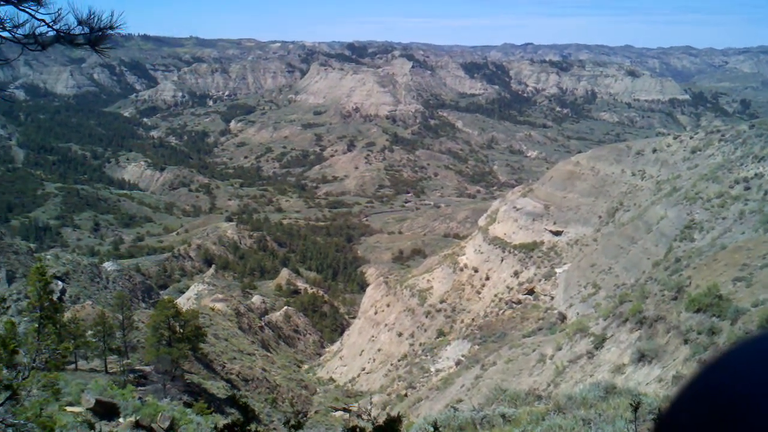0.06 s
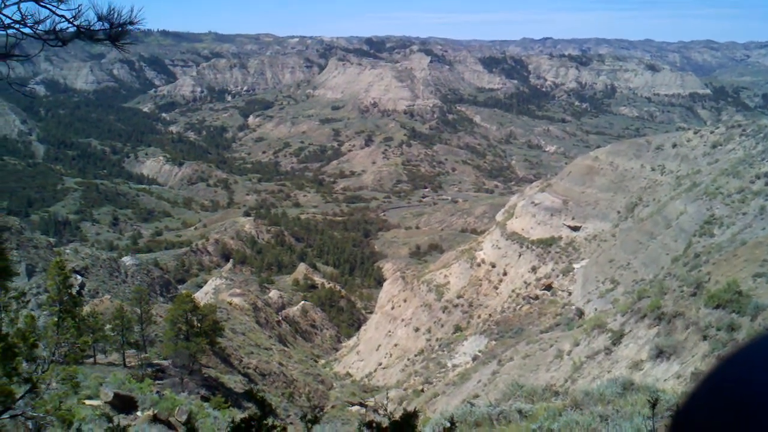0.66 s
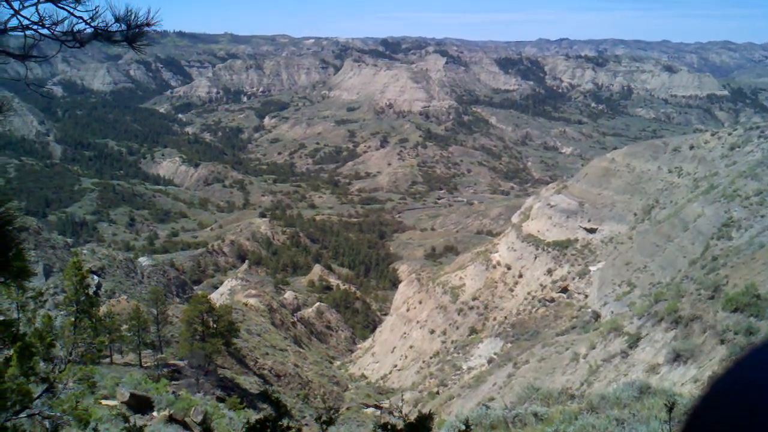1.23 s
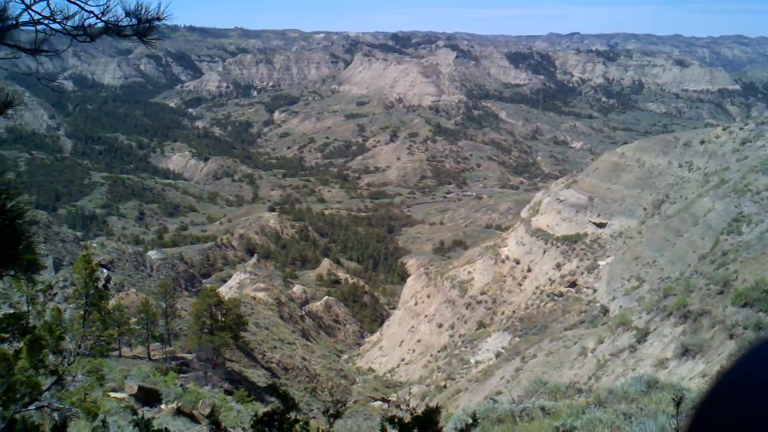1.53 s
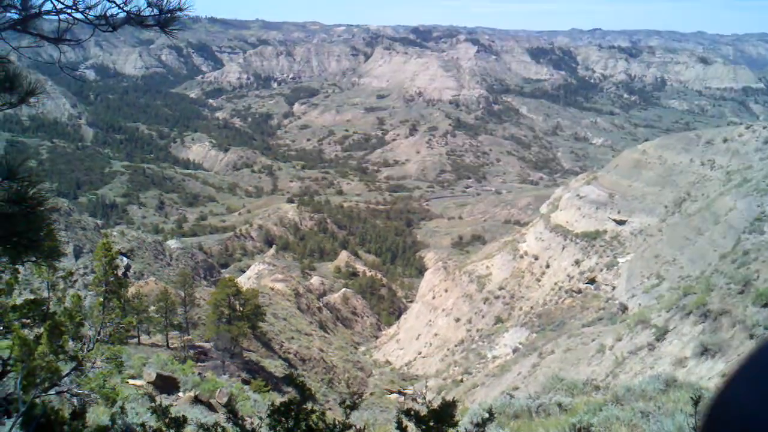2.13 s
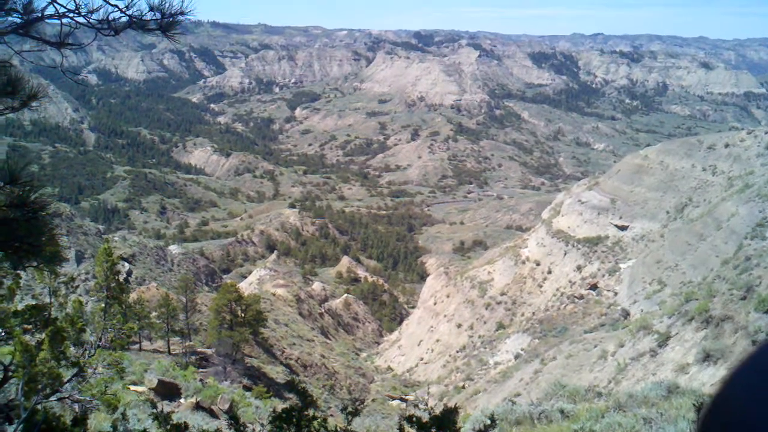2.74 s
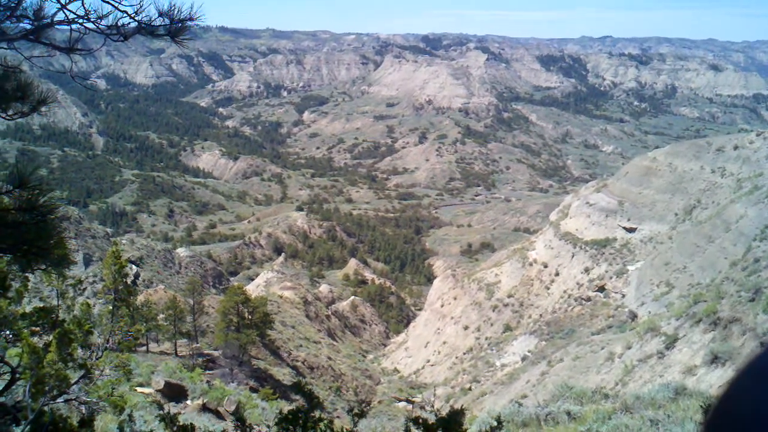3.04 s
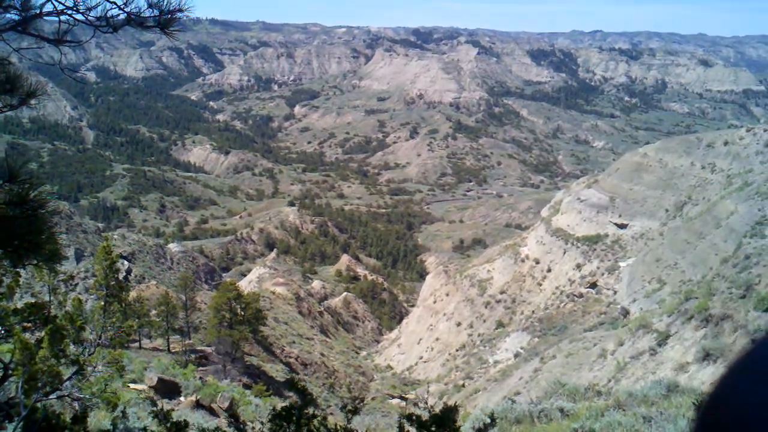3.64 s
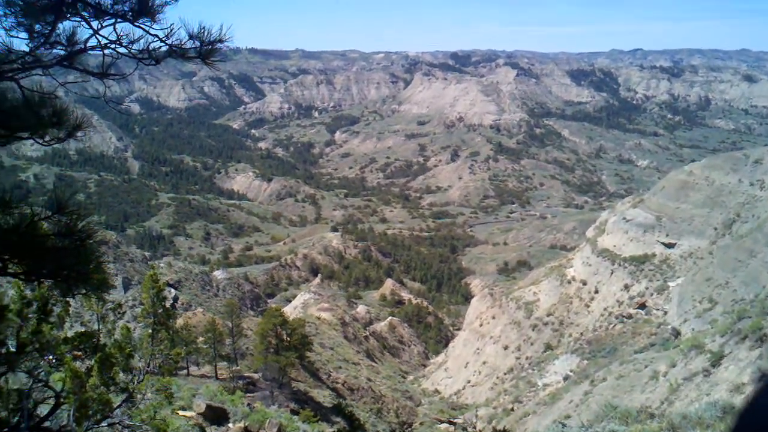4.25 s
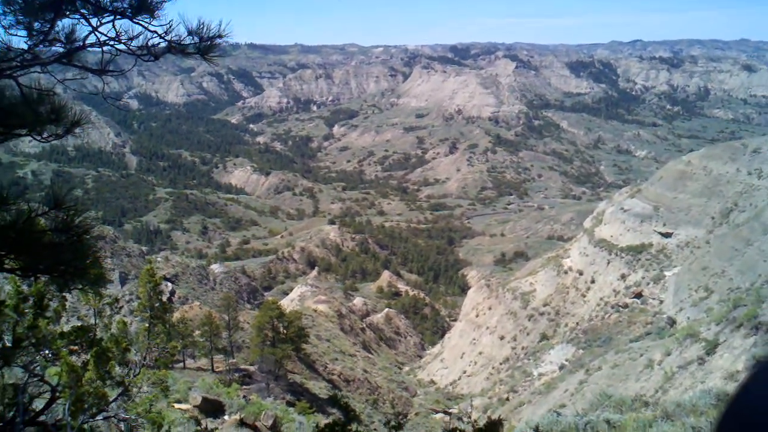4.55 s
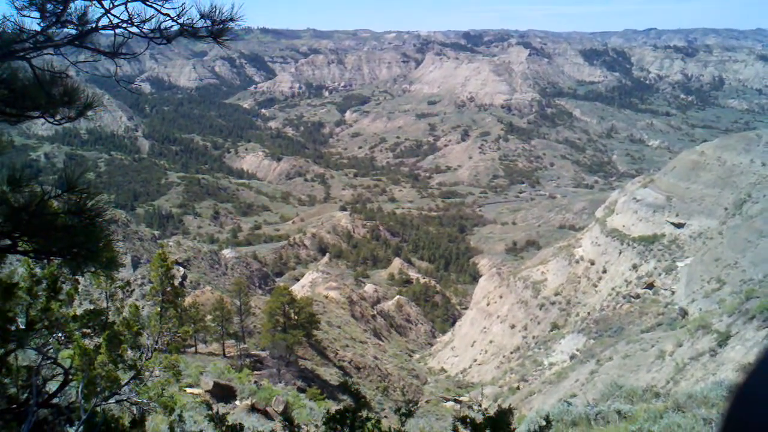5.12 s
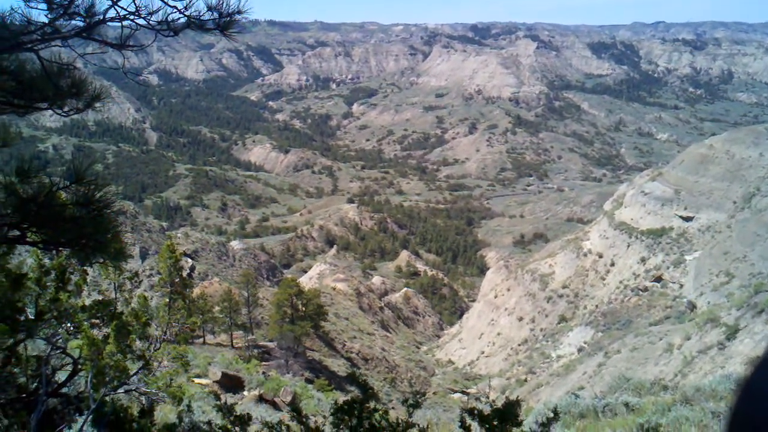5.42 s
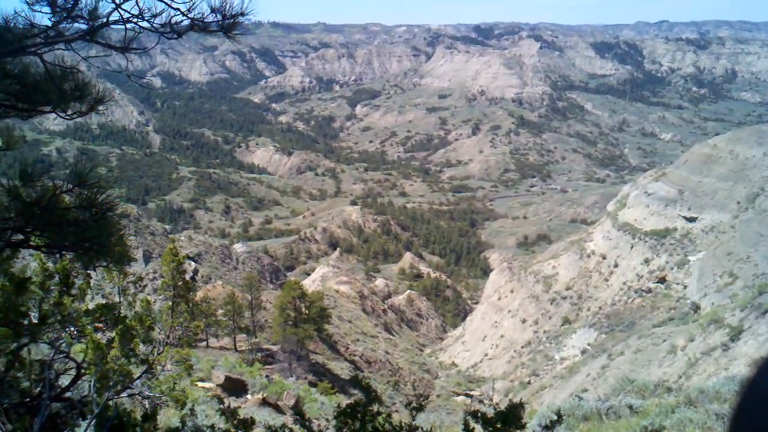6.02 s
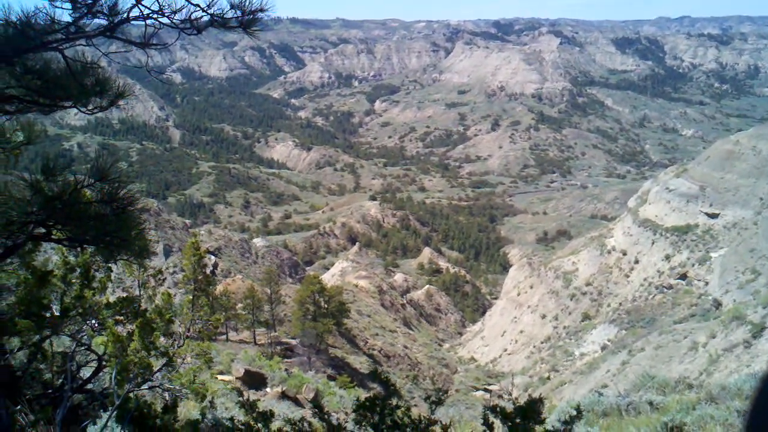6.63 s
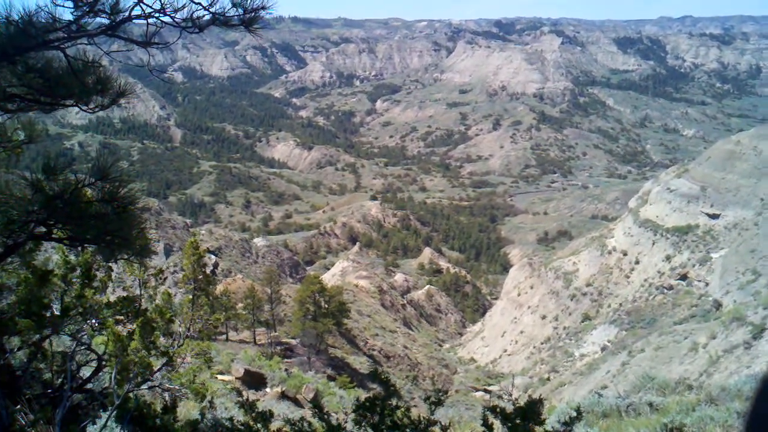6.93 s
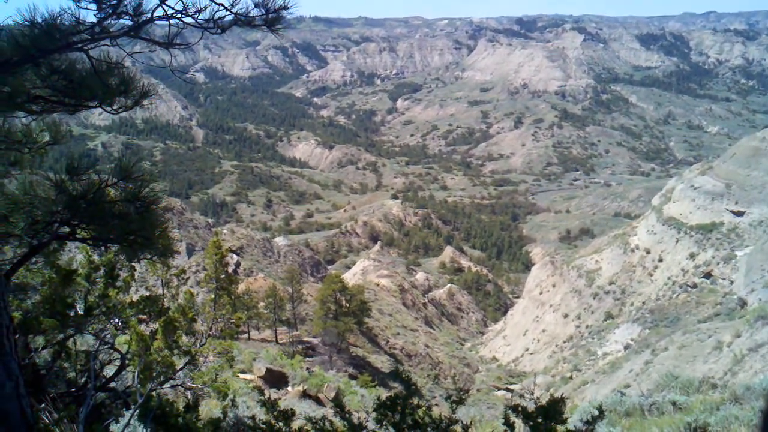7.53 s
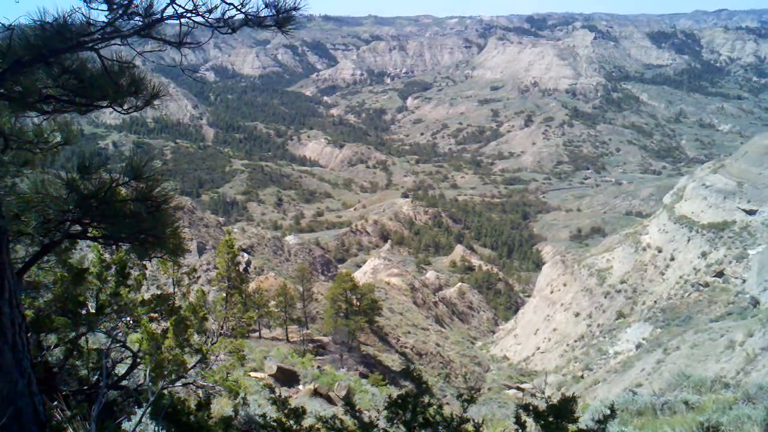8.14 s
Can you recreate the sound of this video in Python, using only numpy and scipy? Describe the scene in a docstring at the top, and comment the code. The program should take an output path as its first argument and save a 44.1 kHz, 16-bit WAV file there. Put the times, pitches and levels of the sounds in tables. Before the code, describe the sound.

A single cricket keeps up an even, high-pitched chirp outdoors, above a faint bed of distant crickets, light wind, hiss and camera motor hum. Soft handling noises lead to two sharp taps on the camera body, followed around the middle by two loud switch clicks, all very close to the microphone and mostly on the right. After that the handling dies away and the cricket continues, the breeze swelling slightly near the end.

```python
"""A cricket chirps in threes on a quiet canyon rim, stridulating: a scraper sweeps a file and the wings
resonate. More crickets call far off, and a faint breeze swells once in the pines.
Fingers tap and rub a hand-held camera and its switch snaps down and up, exciting damped modes; its
motor hums faintly. The camera widens its two close microphones by cross-feed and ducks after loud clicks."""
import sys
import numpy as np
from scipy import signal
from scipy.fft import rfft, irfft, next_fast_len
from scipy.io import wavfile
from scipy.ndimage import uniform_filter1d, map_coordinates

SR = 44100
rng = np.random.default_rng(int(sys.argv[2]) if len(sys.argv) > 2 else 0)


def master_out(mix):
    """Clip the mix to full scale and print it as 16-bit PCM to the path in sys.argv[1]."""
    frames = np.transpose(np.atleast_2d(mix))
    ceiling = np.clip(frames, -1, 1)
    pcm = np.round(ceiling * 32767).astype(np.int16)
    wavfile.write(sys.argv[1], SR, pcm)


N = 364814

# the three wing strokes of a chirp: level_db, length_s, pitch_offset_hz
WING_STROKES = [(-0.5, .017, -45), (-0.2, .0205, 0), (0.3, .021, 15)]
# modes of the casing: pitch_hz, level_db, t60_s, polarity
CASING_MODES = [(400.7, -21.5, .012, -1), (750, -22.5, 0.002, -1), (1288.6, 1, 0.0087, 1),
                (1850, -20, 0.0037, -1), (2319, -23.5, 0.0044, -1), (3820, -17.5, .004, -1),
                (4200, -15, 0.0023, -1), (5900, -31, .003, -1), (11500, -25, .002, 1)]
# modes of the whole camera in the hand: pitch_hz, level_db, t60_s, polarity
GRIP_MODES = [(95, -9, .03, 1), (250, 0.5, 0.017, -1), (430, -5.5, .014, -1), (630, -11.5, .008, -1)]


def cricket(wing_hz=5830, stray_hz=18, usual_db=-51, slowing=.03, echo_db=-11):
    """Wing resonance sets the pitch; time and level differences between microphones set the direction."""
    # chirps: first_stroke_middle_s, level_db
    chirps = [(.352, -53), (.744, -53.5), (1.102, -53.5), (1.490, -53), (1.776, -52), (2.162, -53),
              (2.625, -53.5), (2.941, -49.5), (3.276, -50.3), (3.629, -49.5), (4.051, -50), (4.455, -51),
              (4.801, -50), (5.191, -49.3), (5.671, -48.5), (6.147, -49.5), (6.555, -50.5), (6.904, -51),
              (7.251, -51), (7.543, -52), (7.873, -50.3)]
    # the camera pans left, so the cricket drifts right: time_s, left_lag_s, right_minus_left_db
    pan = [(1.7, -.000044, .6), (4.9, .000048, 1.2)]
    pan_s, lags_s, balances_db = np.transpose(pan)
    left, right = np.zeros((2, N))
    for s, db in chirps:
        spacing_s = .0328 + .0005 * (db - usual_db)  # a stronger chirp spaces its strokes wider
        hz = wing_hz + stray_hz * rng.standard_normal()
        lag_s, balance_db = np.interp(s, pan_s, lags_s), np.interp(s, pan_s, balances_db)
        for k, (stroke_db, length_s, offset_hz) in enumerate(WING_STROKES):
            note = amp(db + stroke_db) * stroke(hz + offset_hz, length_s)
            start_s = s + k * spacing_s * (1 + slowing * (k - 1)) - length_s / 2
            add(left, start_s, amp(-balance_db / 2) * filtered(note, lambda f: delay(f, lag_s)))
            add(right, start_s, amp(balance_db / 2) * note)
    return np.array([left, right]) + amp(echo_db) * scatter(right, t60_s=.16)


def stroke(hz, length_s, flutter_hz=48, flutter_db=2.3, overtone_db=-20, rasp=.13):
    """Stridulation: the scraper's tooth rate on the file arches and sags; uneven teeth add a rasp."""
    # course of one stroke: share_of_length, pitch_offset_hz, level_db
    course = [(0, -19.5, -19), (.18, 10, -5), (.38, 100, -3), (.55, -15, -1.5), (.76, -39.5, -1.5),
              (.9, -120, -9.5), (1, -200, -26)]
    share, bend_hz, level_db = np.transpose(course)
    n = int(length_s * SR)
    progress = np.linspace(0, 1, n)
    pitch_hz = hz + np.interp(progress, share, bend_hz) + flutter_hz * wander(n, 600)
    phase = 2 * np.pi * np.cumsum(pitch_hz) / SR
    level = amp(np.interp(progress, share, level_db) + flutter_db * wander(n, 320))
    level *= signal.windows.tukey(n, .12) * (1 + rasp * wander(n, 1800))
    return level * (np.sin(phase) + amp(overtone_db) * np.sin(2 * phase))


def handling(left_db=-3, crossover_hz=6500, crossing_s=.00026):
    """Structure-borne sound reaches the right microphone; only its treble crosses to the left."""
    right = taps() + switch() + rubs()
    left = filtered(right, lambda f: f ** 4 / (f ** 4 + crossover_hz ** 4) * delay(f, crossing_s))
    return np.array([amp(left_db) * left, right])


def taps():
    """Impact excitation: fingertips ring the casing, and bumps of the grip shake the whole camera."""
    # finger taps: start_s, peak_db, hardness_hz
    finger_taps = [(.2217, -46, 500), (1.646, -43, 1500), (1.6735, -41, 4000), (1.680, -37.5, 696),
                   (2.3352, -40, 600), (2.4513, -6, 3270), (2.4939, -10, 6440), (2.544, -29.5, 417),
                   (3.931, -40, 2500), (3.964, -44, 600), (4.167, -46, 1500)]
    # firm bumps of the grip: start_s, peak_db, hardness_hz
    grip_bumps = [(.2232, -33, 350), (1.173, -42.5, 500), (1.249, -44, 300), (1.345, -40.5, 330),
                  (1.401, -38, 300), (1.587, -42, 400), (1.680, -35.5, 1200), (2.5443, -24.5, 700),
                  (5.1332, -37, 200)]
    body = np.zeros(N)
    for s, db, hardness_hz in finger_taps:
        add(body, s, amp(db) * blow(CASING_MODES, hardness_hz))
    for s, db, hardness_hz in grip_bumps:
        add(body, s, amp(db) * blow(GRIP_MODES, hardness_hz, low_hz=45))
    return body


def switch(push_hardness_hz=350):
    """Each snap is an impulse that rings the switch's modes, over a dull push on the casing."""
    # modes of the switch: pitch_hz, level_db, t60_s, polarity
    modes = [(1482, 1, 0.0029, 1), (2465, -0.5, .0068, -1), (3980, -16, 0.0038, -1), (4738, -18, .003, -1),
             (7000, -28, .003, -1), (9994, -37, 0.0015, 1), (11150, -45.5, .025, 1), (13200, -20, .002, 1)]
    # snaps: start_s, peak_db, hardness_hz, push_relative_db
    snaps = [(1.685, -32, 20000, -20), (4.3746, 1, 13960, -33), (4.452, -43, 6000, -22.5),
             (4.4828, -3.5, 18000, -17.5), (5.1333, -34, 3000, 5)]
    push = blow(CASING_MODES, push_hardness_hz)
    body = np.zeros(N)
    for s, db, hardness_hz, push_db in snaps:
        add(body, s, amp(db) * (blow(modes, hardness_hz) + amp(push_db) * push))
    return body


def rubs(slips_per_s=1800, drag_db=-10):
    """Stick-slip friction: a sliding finger gives the camera a dense train of tiny random blows."""
    # finger slides on the casing: start_s, end_s, start_db, end_db
    slides = [(1.635, 1.686, -61, -60), (1.678, 1.692, -37.5, -46.5), (2.015, 2.040, -53, -57.5),
              (2.497, 2.554, -43.5, -48), (3.481, 3.611, -71.5, -55.5), (3.970, 4.058, -54.5, -49),
              (4.167, 4.238, -59, -57.5)]
    slip = blow(CASING_MODES, hardness_hz=3200) + amp(drag_db) * blow(GRIP_MODES, hardness_hz=800)
    body = np.zeros(N)
    for start_s, end_s, start_db, end_db in slides:
        n = int((end_s - start_s) * SR)
        grains = rng.standard_normal(n) * (rng.random(n) < slips_per_s / SR)
        grains *= signal.windows.tukey(n, .2)
        rub = signal.fftconvolve(grains * amp(np.linspace(0, end_db - start_db, n)), slip)
        rms = np.sqrt(np.mean(grains ** 2) * np.sum(slip ** 2) + 1e-20)
        add(body, start_s, amp(start_db) * rub / rms)
    return body


def blow(modes, hardness_hz, low_hz=110):
    """Damped modes ring; soft contact cuts treble above hardness_hz, the microphone bass below low_hz."""
    t = np.arange(2048) / SR
    ring = sum(np.sign(polarity) * amp(db - 60 * t / t60_s) * np.sin(2 * np.pi * hz * t)
               for hz, db, t60_s, polarity in modes)
    pole = np.exp(-2 * np.pi * hardness_hz / SR)
    softened = signal.lfilter([1], np.poly([pole, pole]), np.pad(ring, (0, 2048)))
    heard = signal.sosfilt(signal.butter(2, low_hz, "high", fs=SR, output="sos"), softened)
    return heard / abs(heard).max()


def grip_shifts(band_hz=(70, 190), edge_s=.05, nudges_per_s=9, nudge_over_rumble_db=17, spread_db=6):
    """Friction of the creeping hand makes a low rumble; skin sticks and lets go in soft nudges."""
    # shifts of the grip: start_s, end_s, rumble_db
    shifts = [(.22, .26, -62), (.8, 1.1, -71), (1.2, 1.72, -63), (2.33, 2.6, -61), (2.65, 3.17, -65),
              (3.9, 4.3, -72)]
    t = np.arange(N) / SR
    effort = sum(amp(db) * np.clip(1 + np.minimum(t - start_s, end_s - t) / edge_s, 0, 1)
                 for start_s, end_s, db in shifts)
    band = signal.butter(2, band_hz, "band", fs=SR, output="sos")
    rumble = unit_rms(signal.sosfilt(band, rng.standard_normal(N)))
    nudges = (rng.random(N) < nudges_per_s / SR) * amp(nudge_over_rumble_db - spread_db * rng.random(N))
    thuds = signal.oaconvolve(nudges * effort, blow(GRIP_MODES, hardness_hz=60, low_hz=35))[:N]
    return np.array([np.zeros(N), rumble * effort + thuds])


def far_crickets(count=36, low_hz=4750, high_hz=5520, level_db=-76, low_end_db=-7, spacing_s=.034):
    """Superposition: distant crickets, each on its own pitch, chirp at random and blur in echoes."""
    chorus = np.zeros(N)
    for rank in np.linspace(0, 1, count):
        chirp = np.zeros(SR // 4)
        for k, (db, length_s, offset_hz) in enumerate(WING_STROKES):
            hz = low_hz + rank * (high_hz - low_hz) + offset_hz
            add(chirp, k * spacing_s, amp(db) * stroke(hz, length_s, flutter_hz=191))
        for when, faintness in rng.random(size=(5, 2)):
            add(chorus, when * N / SR, amp(-9 * faintness + low_end_db * (1 - rank)) * chirp)
    return amp(level_db) * unit_rms(chorus + amp(6) * scatter(chorus, t60_s=.12))


def scatter(x, t60_s):
    """Scattering from trees and rock sends each microphone its own sparse, decaying echoes."""
    t = np.arange(SR // 2) / SR
    echoes = rng.standard_normal((2, len(t))) * (rng.random((2, len(t))) < .05)
    echoes *= (t > .003) * amp(-60 * t / t60_s)
    echoes /= np.linalg.norm(echoes, axis=1, keepdims=True)
    return signal.fftconvolve(x[None], echoes, axes=1)[:, :N]


def breeze(level_db=-64.5, left_db=-7, gust_db=.88, swell_db=-69, swell_at_s=8, swell_width_s=.7):
    """Wind noise, partly coherent between the microphones, with one swell that sighs in the pines."""
    # spectrum of the breeze: frequency_hz, relative_density_db
    spectrum = [(20, -38), (45, -26.5), (85, -4.5), (160, 1.5), (300, -3.5), (430, -7), (700, -15.5),
                (1100, -22), (2000, -32), (5000, -55)]
    noise = rng.standard_normal((3, N))
    wind = noise[:2] + amp(-6) * noise[2]
    steady = amp(level_db) * unit_rms(filtered(wind, lambda f: amp(log_interp(spectrum, f))))
    sigh_hz, sigh_octaves = 390, .45
    sigh = filtered(rng.standard_normal((2, N)),
                    lambda f: np.exp(-(np.log2((f + 1) / sigh_hz) / sigh_octaves) ** 2))
    swell = amp(swell_db) / (1 + ((np.arange(N) / SR - swell_at_s) / swell_width_s) ** 2)
    return (steady + swell * unit_rms(sigh)) * amp(gust_db * wander(N, 3.3)) * amp([[left_db], [0]])


def motor(rotation_hz=92.9, sway_db=1.36):
    """The camera's motor hums at harmonics of its rotation rate, beside the right microphone."""
    # harmonics of the motor: multiple, level_db
    orders = [(1, -75), (2, -70), (3, -70), (4, -72.5), (5, -78.5), (6, -84.5), (9, -85), (10, -85.5),
              (11, -84.5), (12, -90.5), (16, -93), (17, -93), (18, -92.5), (19, -92.5)]
    turns = np.cumsum(rotation_hz * (1 + .001 * wander(N, 6))) / SR
    share = np.linspace(0, 1, 1024)
    one_turn = sum(amp(db) * np.sin(2 * np.pi * (k * share + rng.random())) for k, db in orders)
    hum = np.interp(turns % 1, share, one_turn) * amp(sway_db * wander(N, 4))
    return np.array([np.zeros(N), hum])


def hiss(level_db=-68):
    """Self-noise of the microphones is steady and uncorrelated between them."""
    # spectrum of the hiss: frequency_hz, relative_density_db
    spectrum = [(100, -1), (1300, 0.5), (2600, -1), (3400, -1.5), (4100, -4.5), (6500, -1.5), (8000, 0),
                (11000, 1.5), (14000, .5)]
    noise = filtered(rng.standard_normal((2, N)), lambda f: amp(log_interp(spectrum, f)))
    return amp(level_db) * unit_rms(noise)


def amp(db):
    return 10 ** (np.asarray(db) / 20)


def unit_rms(x):
    return x / np.sqrt(np.mean(x ** 2) + 1e-20)


def log_interp(points, hz):
    """Joins points by straight lines on a log-frequency axis."""
    f, value = np.transpose(points)
    return np.interp(np.log(hz + 1), np.log(f + 1), value)


def add(mix, start_s, sound):
    part = mix[max(round(start_s * SR), 0):][:len(sound)]
    part += sound[:len(part)]


def delay(hz, lag_s):
    """A time delay is a phase lag proportional to frequency."""
    return np.exp(-2j * np.pi * hz * lag_s)


def filtered(x, response):
    """Linear filtering multiplies the spectrum by a frequency response."""
    size = next_fast_len(x.shape[-1] + 2048)
    return irfft(rfft(x, size) * response(np.fft.rfftfreq(size, 1 / SR)), size)[..., :x.shape[-1]]


def wander(n, rate_hz):
    """Smooth random modulation of about unit size."""
    step = SR / rate_hz
    knots = rng.standard_normal(int(n / step) + 4)
    return map_coordinates(knots, [np.arange(n) / step], order=3, mode="nearest")


def scene():
    """The sources superpose at the two microphones."""
    return cricket() + far_crickets() + handling() + grip_shifts() + motor() + breeze() + hiss()


def record(dry, cross_s=.000385, threshold_db=-13, slope=.39, attack_s=.01, recovery_db_per_s=2.2):
    """Antiphase cross-feed widens the stereo; gain control ducks after loud clicks; the band is limited."""
    # part of the opposite channel that is delayed and subtracted: frequency_hz, share
    crossfeed = [(50, .93), (1200, .92), (2700, .97), (4000, 0.97), (5800, 0.35), (8000, .25), (14000, .17)]
    wide = dry - filtered(dry[::-1], lambda f: log_interp(crossfeed, f) * delay(f, cross_s))
    power_db = 10 * np.log10(abs(uniform_filter1d((wide ** 2).mean(0), size=88)) + 1e-12)
    excess_db = np.maximum(power_db - threshold_db, 0)
    recovery_db = np.arange(N) * recovery_db_per_s / SR
    duck_db = np.maximum.accumulate(slope * excess_db + recovery_db) - recovery_db
    pole = np.exp(-1 / (attack_s * SR))  # the gain takes a moment to fall, so the click gets through
    ducked = wide * amp(-signal.lfilter([1 - pole], [1, -pole], duck_db))
    rounded = np.tanh(ducked)  # the loudest snap rounds off at full scale
    lowpass = signal.firwin(511, cutoff=14100, window=("kaiser", 9), fs=SR)
    return signal.oaconvolve(rounded, lowpass[None], "same")


dry = scene()
out = record(dry)
master_out(out)
```